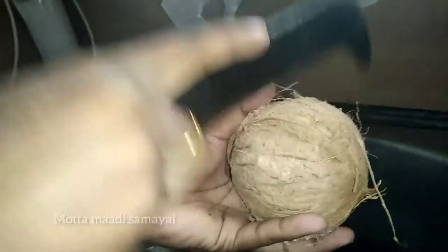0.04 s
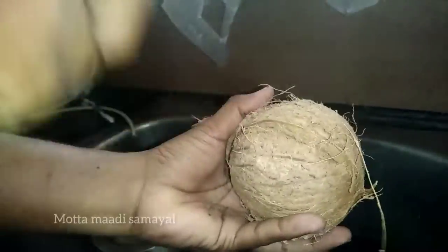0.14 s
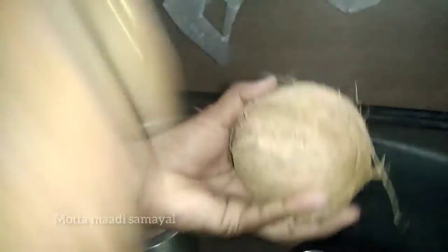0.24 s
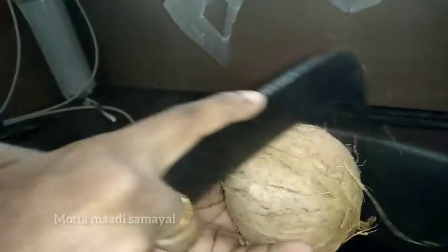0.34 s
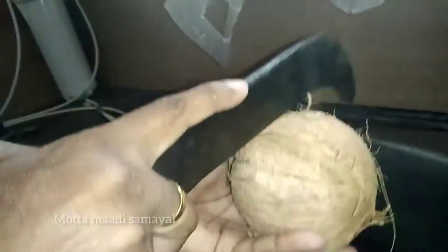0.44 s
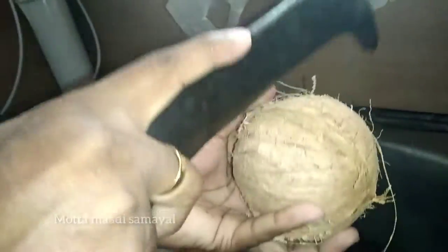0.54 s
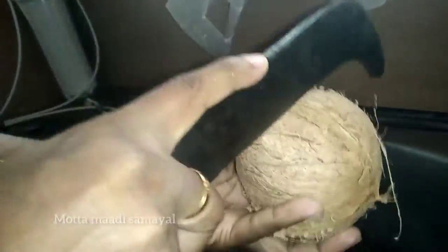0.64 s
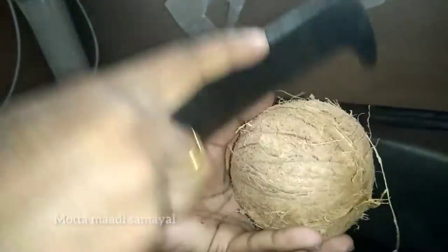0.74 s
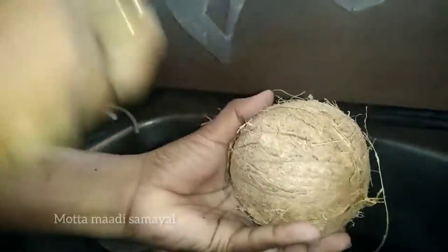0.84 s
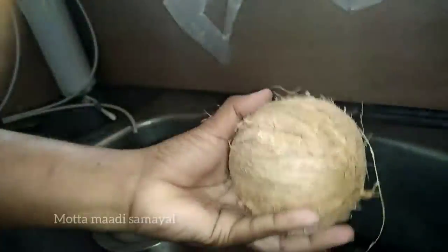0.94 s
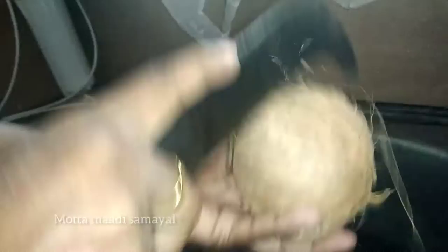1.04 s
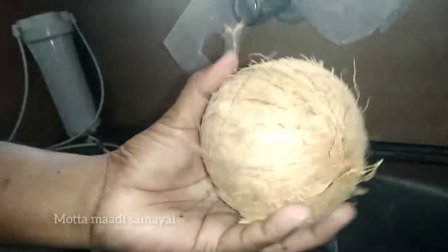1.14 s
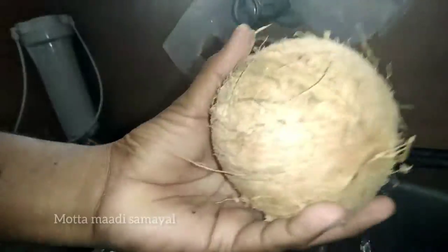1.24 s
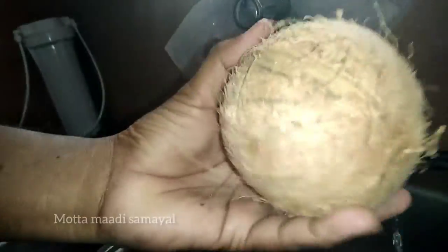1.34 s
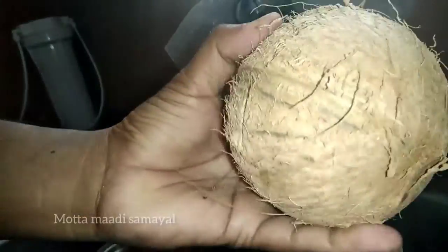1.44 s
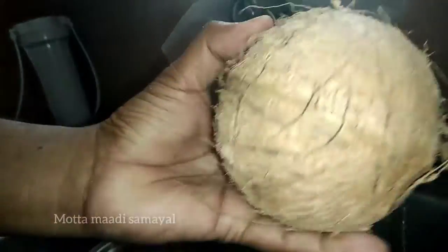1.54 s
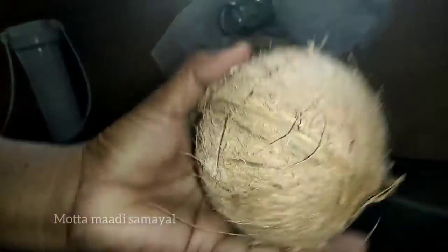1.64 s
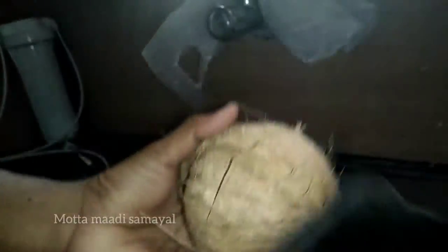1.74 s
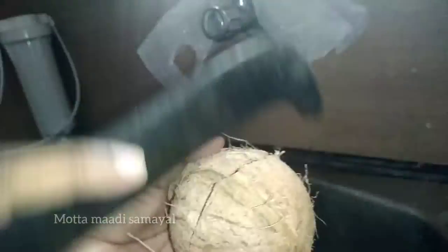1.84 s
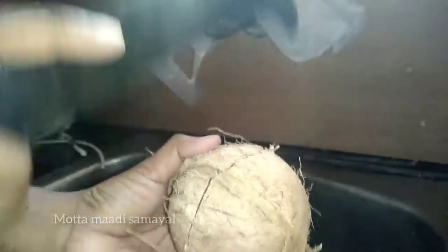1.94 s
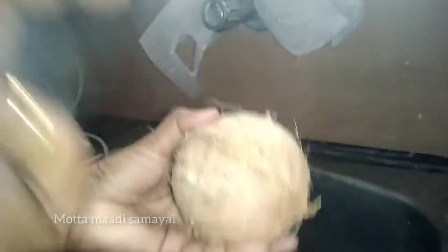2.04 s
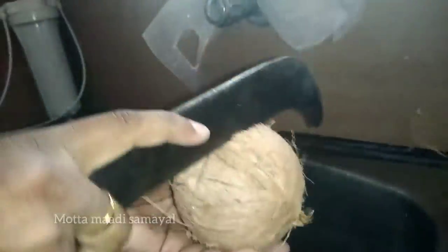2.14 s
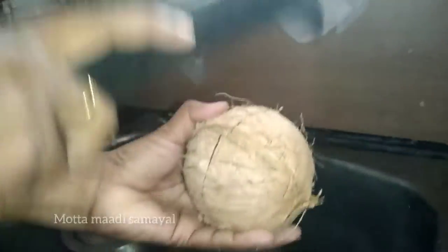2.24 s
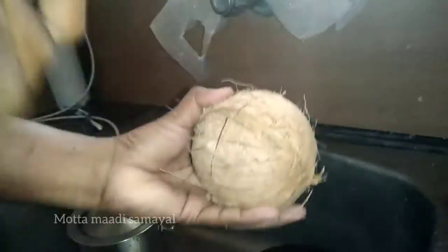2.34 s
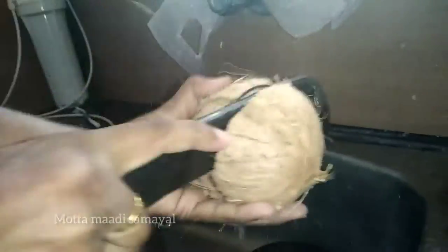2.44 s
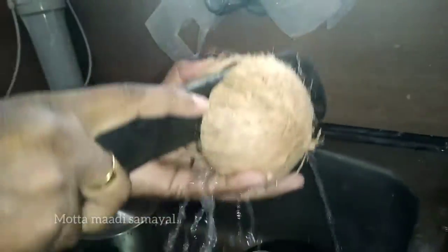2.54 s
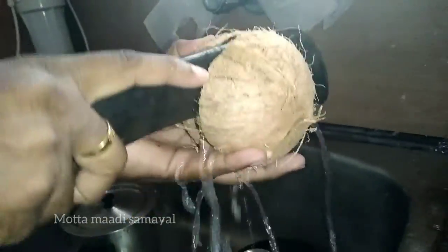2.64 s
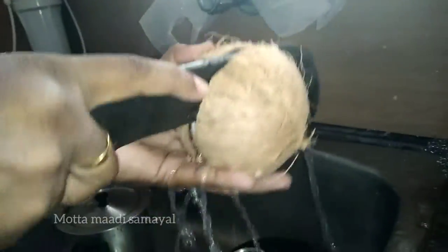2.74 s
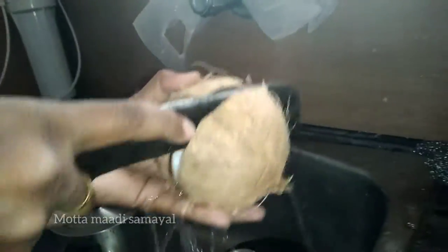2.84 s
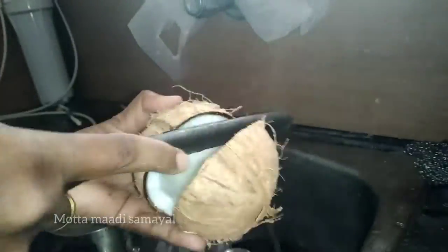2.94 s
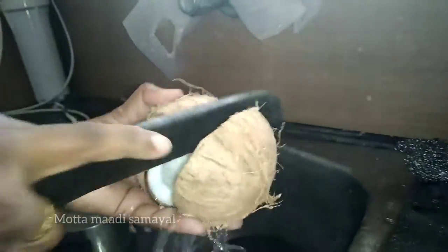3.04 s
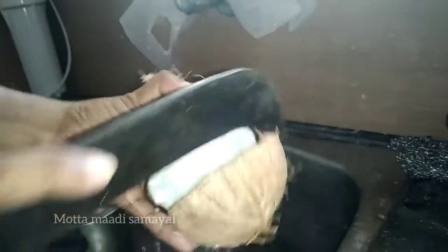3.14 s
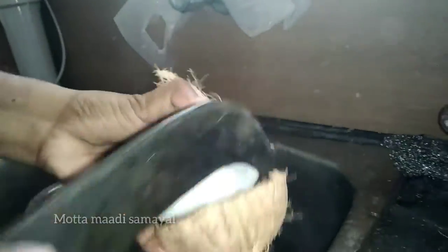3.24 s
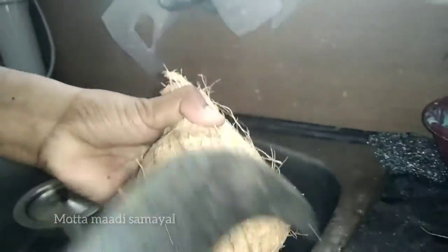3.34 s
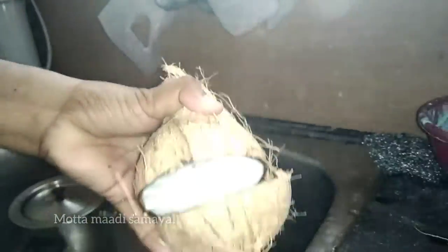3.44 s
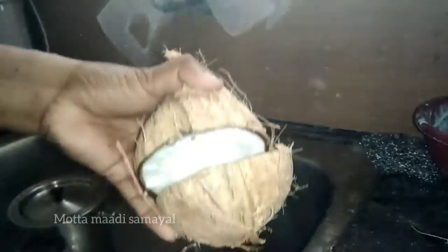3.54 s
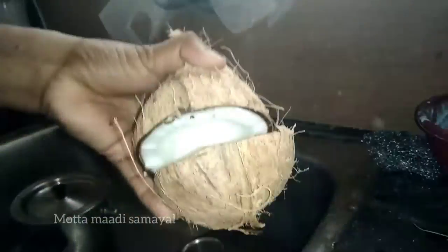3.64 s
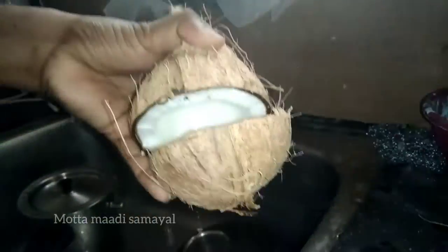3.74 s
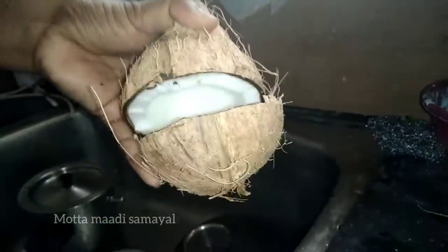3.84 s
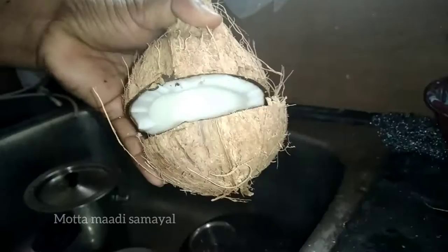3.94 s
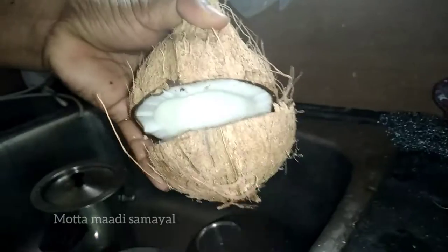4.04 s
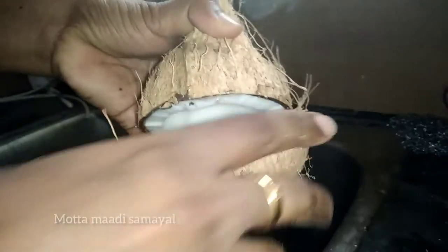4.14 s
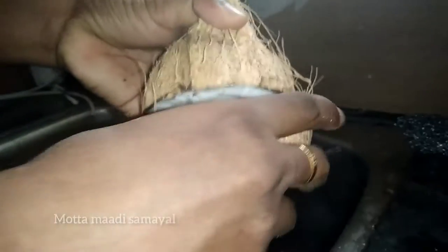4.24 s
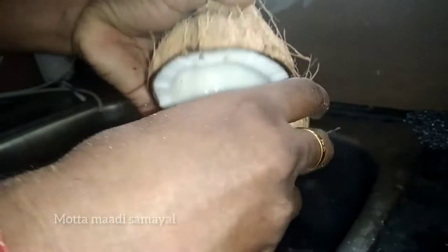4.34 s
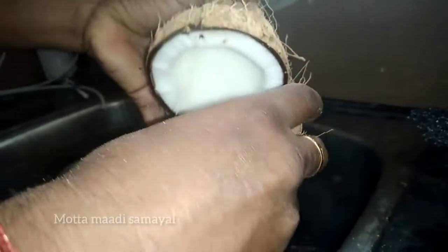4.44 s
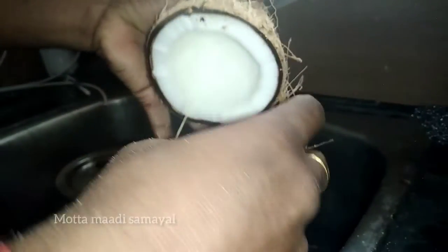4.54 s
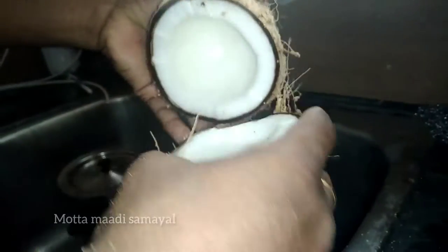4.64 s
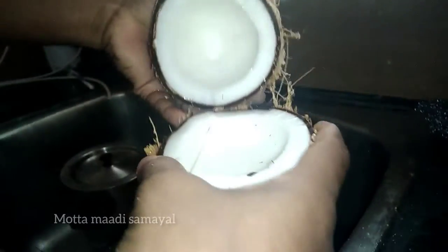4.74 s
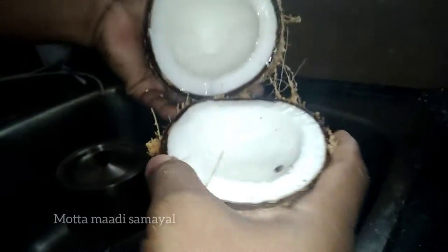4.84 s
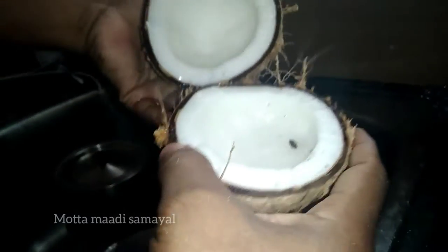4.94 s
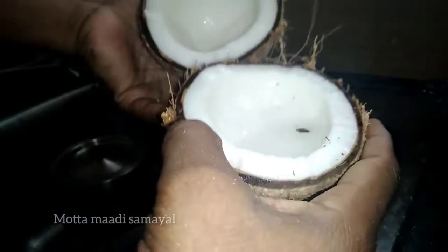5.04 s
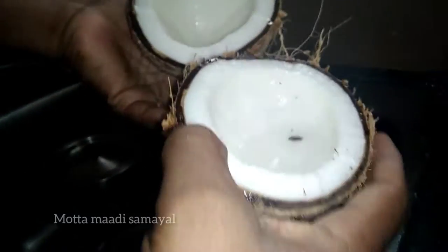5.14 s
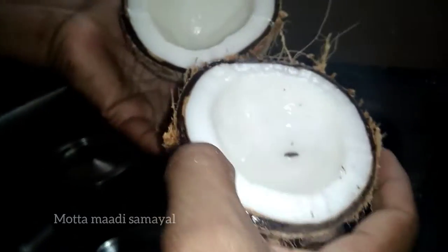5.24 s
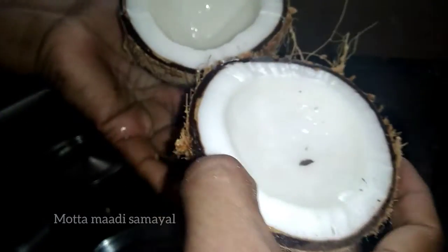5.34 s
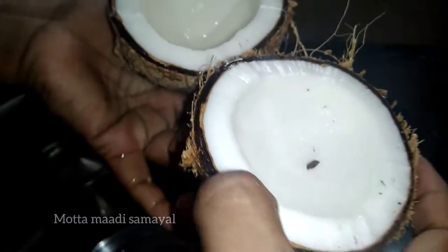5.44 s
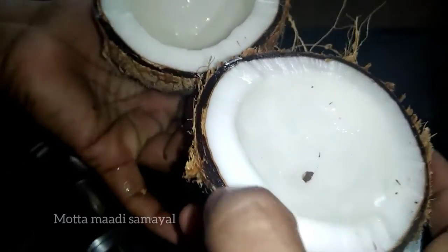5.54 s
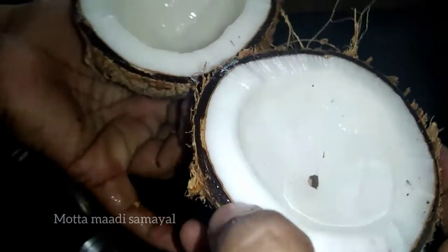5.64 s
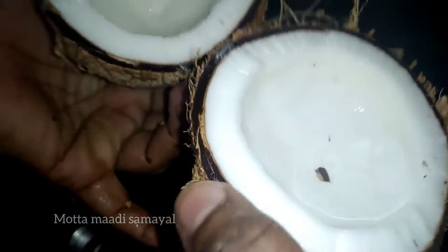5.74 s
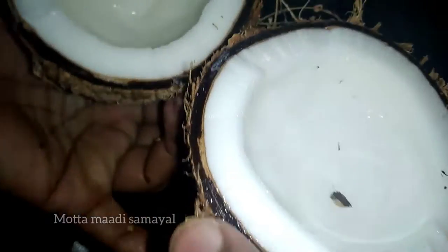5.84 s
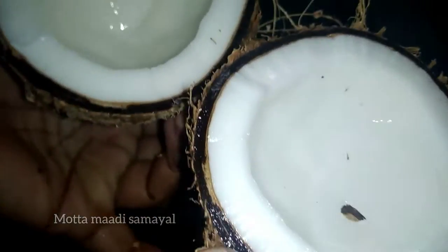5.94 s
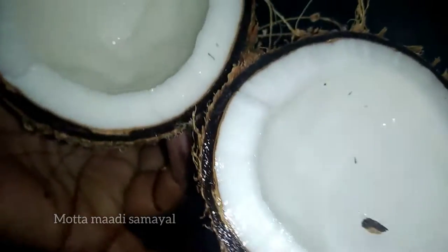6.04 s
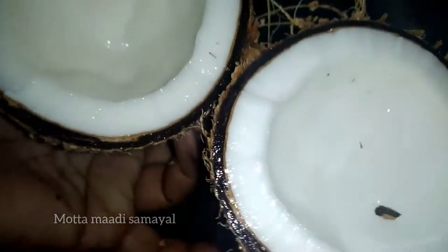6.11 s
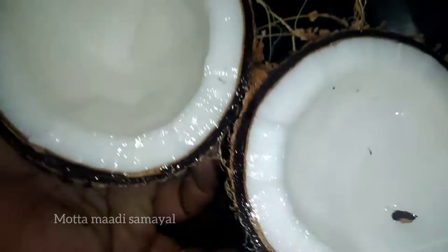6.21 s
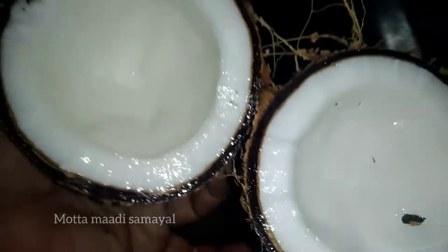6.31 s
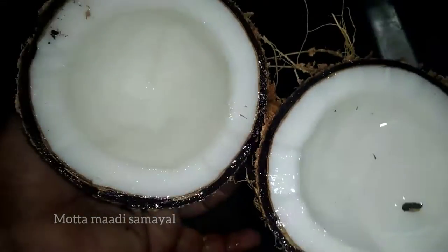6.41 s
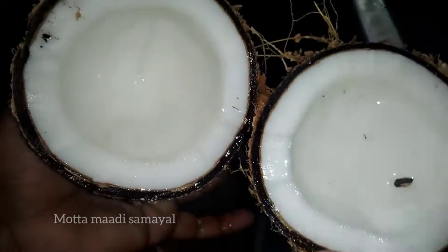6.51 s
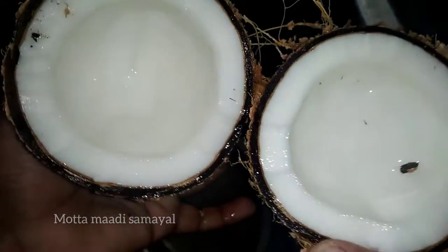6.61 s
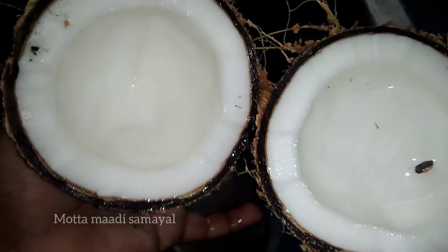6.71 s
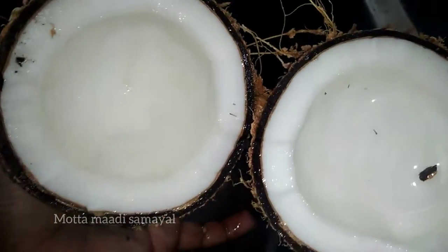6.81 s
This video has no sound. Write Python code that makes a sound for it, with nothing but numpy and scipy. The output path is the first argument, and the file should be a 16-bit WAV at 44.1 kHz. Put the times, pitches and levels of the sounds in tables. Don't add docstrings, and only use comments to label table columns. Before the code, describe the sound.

Heard from a nearby phone with squashed, slightly clipped peaks and a lively echo: heavy blade blows on a coconut, one lighter tap among them, a dry snap, then two cracking hits that open the shell. Liquid trickles, husk fibres tick and tear, metal chatters and bangs on the sink. Afterwards only tiny rustles, a low drain hum and faint distant bird tones remain.

```python
import sys
import numpy as np
from scipy import signal
from scipy.fft import rfft, irfft, next_fast_len
from scipy.io import wavfile
from scipy.ndimage import uniform_filter1d, minimum_filter1d, map_coordinates

SR = 44100
rng = np.random.default_rng(int(sys.argv[2]) if len(sys.argv) > 2 else 0)


def digitize_waveform(pressure):
    field = np.atleast_2d(pressure).T
    bounded = np.clip(field, -1, 1)
    quanta = np.round(bounded * 32767).astype(np.int16)
    wavfile.write(sys.argv[1], SR, quanta)


def rack_gain(trim_db):
    fader = np.asarray(trim_db, float)
    return 10 ** (fader / 20)


N = 302946


def nut_blows():
    # start_s, peak_db, room_db
    blows = [
        (-.12, -18, 8.5),
        (0.247, -4, 8.5),
    ]
    # start_s, peak_db, room_db
    tap = [
        (0.612, -28.5, 2),
        (0.615, -14.5, -14.5),
    ]
    # start_s, peak_db, room_db
    third = [
        (0.978, -23.5, 13.5),
        (0.983, -12, 9),
    ]
    # start_s, peak_db, room_db
    splits = [
        (2.01, -3.5, 6.5),
        (2.339, -0.2, 3.5),
    ]
    # start_s, peak_db, room_db
    snap = [
        (1.334, -6, -19.5),
    ]
    # start_s, peak_db, room_db
    runs_on = [
        (1.339, -14.5, -16),
        (1.343, -15.5, -17),
    ]
    # centre_hz, width_hz, level_db
    shell = [(440, 29, -4.5), (605, 46, 1.5), (807, 300, 2), (1335, 990, 2)]
    # centre_hz, width_hz, level_db
    cracked = [(440, 250, -13), (810, 67, 2), (890, 68, 3.5), (1242, 300, -10.5), (1580, 110, -1)]
    # centre_hz, width_hz, level_db
    opened = [(402, 100, -10.5), (834, 87, 5.5), (1124, 123, 3), (1430, 120, 0), (1563, 130, 2)]
    # centre_hz, width_hz, level_db
    seam = [(2360, 20, -1.5), (3210, 46, 2.5), (3960, 67, -5), (5130, 70, -5), (6150, 150, -11),
            (8700, 60, -9.5), (9060, 53, -15), (10800, 150, -14)]
    # centre_hz, width_hz, level_db
    wider = [(2290, 70, 2), (3300, 90, -3.5), (4320, 90, -4.5), (5200, 90, -5), (8500, 60, -7),
             (9420, 80, -12.5)]
    whole_db = [-1, -7.5, 4, -17, -20, -18, 0, -28, -12.5, -7.5, 1, -4.5, -13, -5, -12.5, -4.5, -2, -8.5,
                -6.5, 0, -34, 3, 2, 3, -5, 9, 1, 6, -7.5, 1.5, -3, -2, -18, -12.5, -5.5, -8.5, -9]
    flat_db = [2.5, 3.5, 5, -6.5, -16.5, -10, 0, -23, -15, -9.5, 2, -9, -22.5, -9, -9.5, -8.5, -8.5, -12,
               -14, -7, -18, -3.5, -4.5, -9, -13, -1.5, -6.5, 3.5, -12.5, -3.5, -7.5, -10, -15, -8, -11,
               -14.5, -16]
    edgewise_db = [-13.5, -22, 8, -14, -22.5, -16, -0.5, -26, -30, -16, 0.5, -22, -20, -6, -1, 2.5, 1.5,
                   -20, -9.5, 8, -14, -5, 1, -9, 8.5, 6.5, 1.5, -5.5, -8, -2, -12.5, -12, -17.5, -12, -13.5,
                   -15, -15]
    cracked_db = [-6, -2.5, -28, -3, -10.5, -16.5, -2.5, -6, -8, -3.5, -9, -7.5, -9, -10.5, -8, -15, -2.5,
                  -9.5, -13, 3, -24, -6.5, 0.5, -4.5, -2, -8, -9.5, -6.5, -6, -7, -17, -16, -14, -22, -17.5,
                  -16, -11.5]
    wedged_db = [-2.5, 0.5, 0.5, 0, -13, -11, -2.5, -7, -8, -4.5, -1.5, -6.5, -16.5, -7, 0, -16, -3, -10,
                 -8.5, -0.5, -7, -1, -4, -12.5, -3.5, 1.5, -6, -12.5, -8, -11.5, -16, -14, -14, -21, -25,
                 -19, -14.5]
    # from_s, to_s
    silence = (1.029, 1.3)

    nut = strikes(blows, blade(whole_db, width_hz=20), shell, force_db=23.0, crack_s=0.17,
                  thud_db=-14.5, ring_db=2.0, knock_db=-13.5, treble_db=-4.0)
    nut += strikes(third, blade(flat_db, width_hz=47), shell, force_db=21.0, crack_s=0.13,
                   thud_db=-17.5, ring_db=3.0, knock_db=-9.5, treble_db=-3.5)
    t = np.arange(N) / SR
    nut *= uniform_filter1d(1. - ((t > silence[0]) & (t < silence[1])), size=120)
    for split, grip_db, body in zip(splits, (cracked_db, wedged_db), (cracked, opened)):
        nut += strikes([split], blade(grip_db, width_hz=52), body, force_db=19.0, crack_s=0.18,
                       thud_db=-14.0, ring_db=3.5, knock_db=-3.0, treble_db=-2.5, edge_db=-6)
    nut += strikes(tap, blade(edgewise_db, width_hz=20), shell, force_db=24.5, crack_s=0.13,
                   thud_db=-13, ring_db=1.5, knock_db=-6, treble_db=2.0)
    nut += strikes(snap, seam, shell, force_db=13.0, crack_s=0.03, thud_db=-23.5, ring_db=7.5,
                   knock_db=-12.5, treble_db=35.5, edge_db=-6.5, near_db=-5.5)
    nut += strikes(runs_on, wider, shell, force_db=17.0, crack_s=0.04, thud_db=-36, ring_db=11.0,
                   knock_db=-16, treble_db=18, edge_db=-25.5, near_db=-2)
    return nut


def blade_on_sink():
    # start_s, peak_db, room_db
    clatter = [
        (3.462, -23, -1.5),
        (3.466, -9.5, 0),
        (3.477, -10, -3),
    ]
    # start_s, peak_db, room_db
    rocks = [
        (3.496, -8, -9),
        (3.514, -8, -15),
        (3.531, -17.5, -15),
        (3.547, -19, -15),
        (3.636, -24, -16.5),
    ]
    # start_s, peak_db, room_db
    knocks = [
        (3.543, -17, -11),
        (3.638, -18.5, -12.5),
        (3.728, -30.5, -20.5),
        (3.733, -26, -26),
        (3.739, -21, -28.5),
        (3.748, -26, -25),
        (3.756, -26.5, -23.5),
    ]
    # start_s, peak_db, room_db
    drop = [
        (3.867, -4, 1.5),
    ]
    # centre_hz, width_hz, level_db
    basin = [(616, 40, -9), (958, 76, 0.5)]
    laid_db = [-7, 2.5, -7, -30, -0.5, -15.5, 0.5, -3.5, -7, -10.5, -2, -25.5, -6.5, -14, -6.5, -8, -11.5,
               -2, -18, 2, -5.5, -4.5, -5.5, -6, -9, -4, -7, 1.5, -3.5, -14, -15, -15, -14.5, -0.5, -15,
               -17, -11]
    rocking_db = [-3.5, -8, 1, -20, -11, -6.5, -5, 0, -7, -7, -2.5, -25.5, -2, -7, -3, -4.5, -13, -1, -17,
                  4, -4, 1.5, -7, -7.5, -10, -6, -8, 1.5, -2.5, -14, -15, -15.5, -14.5, -3.5, -14, -18,
                  -7.5]
    loose_db = [-6, -2, 0, -20, -7, -10.5, 1, -4, -8.5, -9.5, 1, -8, -9.5, -6.5, -21.5, -9.5, -8, -2, -3,
                -10.5, -21.5, -9.5, 0.5, 3, -4.5, 3, -17.5, -6.5, -2.5, -9, -17.5, -16.5, -18.5, -12, -10.5,
                -16, -13.5]
    # centre_hz, width_hz, level_db
    linger = [(3960, 7, -9)]

    sink = strikes(clatter, blade(laid_db, width_hz=34), basin, force_db=9.0, crack_s=0.08,
                   thud_db=-46.0, ring_db=15.5, knock_db=-20.0, treble_db=4.5, near_db=-5)
    sink += strikes(rocks, blade(rocking_db, width_hz=24), basin, force_db=7.5, crack_s=0.042,
                    thud_db=-45.0, ring_db=11.5, knock_db=-23.0, treble_db=-6.5, near_db=1.5)
    sink += strikes(knocks, blade(laid_db, width_hz=55), basin, force_db=18.0, crack_s=0.11,
                    thud_db=-43.5, ring_db=-0.5, knock_db=9.5, treble_db=-1, edge_db=0)
    sink += strikes(drop, blade(loose_db, width_hz=28) + linger, basin, force_db=22.0, crack_s=0.39,
                    thud_db=-10.0, ring_db=8.0, knock_db=-35.0, treble_db=-3.0, edge_db=-1.0, near_db=-18)
    return sink


def blade(levels_db, width_hz):
    blade_hz = [1700, 2010, 2340, 2680, 2850, 3250, 3930, 4310, 4720, 4980, 5195, 5790, 6080, 6630, 6920,
                7080, 7345, 7865, 8160, 8480, 8950, 9460, 9700, 10080, 10330, 10510, 10800, 11070, 11610,
                11800, 12200, 12600, 12900, 13200, 13400, 14300, 14800]
    return [(hz, max(width_hz, 36), db) for hz, db in zip(blade_hz, levels_db)]


def strikes(events, steel, body, force_db, crack_s, thud_db, ring_db, knock_db, treble_db,
            edge_db=-6.5, near_db=-6.5):
    # freq_hz, density_db (per Hz)
    crack_spectrum = [(24, -53.5), (40, -16.5), (320, -7), (422, 1.5), (697, -5), (918, -2), (1270, -1),
                      (2440, 4), (5050, -6.5), (6170, -11), (9690, -12), (14800, -35.5), (16000, -46)]
    # centre_hz, width_hz, level_db
    shimmer = [(10000, 4800, -5), (11770, 2600, -20.5)]
    # centre_hz, width_hz
    hand = (94, 446)
    shimmer_s, edge_s = 0.12, 0.006
    ports = np.array([[1], [-.3]])
    lead = SR // 4
    out = np.zeros((2, lead + N + SR))
    t = np.arange(SR // 2) / SR
    impulse = 1. * (t == 0)

    def norm(x):
        return x / np.linalg.norm(x, axis=-1, keepdims=True)

    def struck(modes):
        def response(f):
            return sum((-1) ** k * rack_gain(db) * resonance(hz, max(width_hz, 5))(f)
                       for k, (hz, width_hz, db) in enumerate(modes))
        return norm(filtered(impulse, response))

    def colour(f):
        tilt_db = along([(500, -treble_db), (3000, 0)], f)
        return rack_gain(along(crack_spectrum, f) + tilt_db)

    def humps(f):
        return sum(rack_gain(db) * resonance(hz, width_hz)(f) ** 2 for hz, width_hz, db in shimmer)

    ring, knock = struck(steel), struck(body)
    thud = rack_gain(thud_db) * struck([(*hand, 0)])
    for s, db, room_db in events:
        burst = rng.standard_normal((2, len(t))) * rack_gain(-60 * t / crack_s)
        crack = norm(filtered(np.roll(burst, 16, axis=1), colour))
        jangle = rng.standard_normal(len(t)) * rack_gain(-60 * t / shimmer_s)
        dense_modes = rack_gain(shimmer[0][2]) * norm(filtered(jangle, humps))
        tones = rack_gain(ring_db) * (ring + dense_modes) + rack_gain(knock_db) * knock + thud
        into_room = norm(filtered(np.roll(impulse, 64), colour)) + tones
        click = np.diff(rng.standard_normal((2, len(t) + 1))) * rack_gain(-60 * t / edge_s)
        direct = crack + rack_gain(edge_db) * norm(click) + rack_gain(near_db) * tones * ports
        start = lead + round(s * SR)
        out[:, start:start + len(t)] += rack_gain(db + force_db) * (direct + rack_gain(room_db) * echo(into_room))
    return out[:, lead:lead + N]


def echo(x):
    # freq_hz, t60_s
    room = [(80, 0.29), (300, 0.51), (1500, 0.54), (5000, 0.5), (14000, 0.37)]
    hz, t, z = signal.stft(rng.standard_normal((2, len(x))), SR, nperseg=256)
    decay = rack_gain(-60 * t / along(room, hz)[:, None])
    tail = paired(signal.istft(z * decay, SR, nperseg=256)[1])
    return signal.fftconvolve(x[None], tail / np.linalg.norm(tail[0]), axes=1)[:, :len(x)]


def ticks():
    # start_s, peak_db, centre_hz, pan_db
    touches = [(0.22, -24, 1870, -2), (0.95, -22.5, 1830, 1), (1.13, -24.5, 3470, -1),
               (0.9395, -26, 2930, -2), (2.5, -22.5, 2600, 0), (0.22, -27, 3000, -0.5),
               (1.136, -29, 3800, 1), (1.959, -29, 1900, 1), (2.3072, -18, 2200, 1.5),
               (2.831, -26, 2450, -8), (2.9085, -20.5, 2750, 5.5), (3.102, -20.5, 2570, -2),
               (4.586, -36, 3200, 2.5), (2.815, -27.5, 2500, 2), (4.992, -43.5, 3670, -3),
               (5.531, -49, 4700, -9), (5.175, -41, 5100, 1)]
    # start_s, peak_db, centre_hz, pan_db
    snaps = [(0.822, -36, 11500, 6), (1.181, -40, 10000, 2), (1.198, -35, 10000, 2),
             (1.2243, -29, 10300, 2), (1.258, -33, 9600, 8), (1.943, -39, 11300, 3),
             (1.561, -19.5, 12900, -1), (1.676, -31, 12800, -8), (2.702, -17, 10260, 3),
             (2.709, -22, 10000, 4), (2.739, -21, 5914, 1), (2.8014, -33, 11000, 2),
             (2.8145, -17.5, 10800, -6), (2.938, -18, 10000, 3), (2.972, -26, 10400, 3),
             (3.02, -34, 10000, 0), (3.0572, -13, 10000, 6), (3.073, -20, 10000, 6),
             (3.1228, -25, 10800, 5), (3.1923, -23, 4070, -7), (3.356, -26, 11600, 4),
             (3.38, -23, 10000, 6), (3.419, -29, 10200, 13), (4.587, -28.5, 10400, 6),
             (4.635, -34, 11900, 4), (4.647, -30, 11500, 4), (4.771, -34, 11100, -2),
             (4.782, -28.5, 11420, 4), (4.804, -34, 12000, 0), (4.863, -36, 12300, 2),
             (4.877, -31.5, 12000, 5), (5.044, -41, 10600, 3), (5.166, -35, 10100, 3),
             (5.181, -33, 10000, 3), (5.226, -42, 9900, 6), (4.702, -28.5, 11570, 6),
             (4.7491, -33, 13400, 0), (5.056, -38, 10500, 6), (4.814, -34, 12000, 3),
             (5.103, -39, 13000, 3), (5.309, -41, 10500, 5), (5.852, -47, 10000, 5), (6.324, -44, 11000, 5),
             (6.42, -43, 12500, 7), (5.3985, -35.5, 10500, 9), (5.464, -39.5, 10300, 6),
             (5.53, -34, 8950, -4), (6.242, -42.5, 11200, 8.5), (6.446, -43, 10800, 15)]
    touch_t60_s, snap_t60_s = 0.035, 0.022
    broad_db, broad_hz = -15, 4200
    out = np.zeros((2, N + SR))
    t = np.arange(SR // 4) / SR
    events = [(*row, touch_t60_s) for row in touches] + [(*row, snap_t60_s) for row in snaps]
    for s, db, hz, pan_db, t60_s in events:
        def response(f):
            wide = (hz > broad_hz) * rack_gain(broad_db) * resonance(broad_hz, 2 * broad_hz)(f)
            return resonance(hz, 0.35 * hz)(f) ** 2 + wide

        onset = 1 - np.exp(-t * hz / 4)
        burst = rng.standard_normal((2, len(t))) * rack_gain(-60 * t / t60_s) * onset
        tick = filtered(burst, response)
        tick = tick / np.abs(tick).max(axis=1, keepdims=True) * rack_gain([[pan_db / 2], [-pan_db / 2]])
        out[:, round(s * SR):][:, :len(t)] += rack_gain(db + 2.5) * (tick + rack_gain(-7.0) * echo(tick[0]))
    return out[:, :N]


def handling():
    # start_s, hold_s, level_db, dull_db (dull rub over fibres)
    strokes = [(0.934, 0.05, -44, 14.5), (1.082, 0.024, -36.5, 1), (1.264, 0.14, -50, 12),
               (1.486, 0.0097, -37.5, -7), (1.606, 0.066, -52.5, 7), (3.7, 0.018, -44.5, 13.5),
               (3.79, 0.081, -50.5, 8.5), (4.105, 0.12, -44, 4), (4.768, 0.031, -57, 3),
               (4.876, 0.079, -50.5, 2), (5.173, 0.024, -49.5, -3), (4.41, 0.12, -53, 2.5),
               (5.487, 0.15, -63.5, 2), (5.739, 0.12, -65, -6.5), (6.412, 0.096, -64.5, 15),
               (6.596, 0.16, -79.5, 25)]
    # start_s, level_db, dull_db (dull
    flicks = [(.218, -47, 8), (.854, -62, -26), (1.141, -42, 0), (1.52, -58, -23), (1.854, -48.5, 0),
              (1.96, -47.5, 10), (2.742, -43.5, 10), (3.106, -33, -6), (3.128, -46, -13), (3.199, -31, -18),
              (3.358, -31.5, -2.5), (3.382, -45, -2), (3.429, -45, -1), (3.636, -34, 0),
              (4.282, -42.5, -18), (4.297, -61, -12), (4.587, -50.5, 11), (4.641, -43, -6),
              (4.7, -51.5, 7.5), (4.752, -61, -8), (4.789, -56, -12), (5.2, -63, -4), (5.24, -58, 4),
              (4.88, -59, -10), (5.305, -53, -3), (5.401, -86, -21), (5.53, -51, -8), (6.24, -59.5, 12.5),
              (6.32, -59, 5), (6.84, -75, -7)]
    # time_s, flow_db
    water = [(2.53, -69), (2.6, -28.5), (2.685, -36.5), (2.74, -31), (2.77, -32.5), (2.79, -32.5),
             (2.84, -28), (2.89, -32.5), (2.908, -25.5), (3.03, -26.5), (3.05, -31), (3.235, -34),
             (3.27, -33.5), (3.45, -56.5)]
    # freq_hz, density_db (per Hz)
    fibre_spectrum = [(2060, -28), (3500, -2.5), (4340, -3.5), (5670, -6), (6740, -6.5), (9930, 4.5),
                      (11800, -2), (14900, -6.5), (16000, -12.5)]
    # freq_hz, density_db (per Hz)
    rub_spectrum = [(59, -41), (130, -1), (200, -3.5), (449, -4.5), (584, -4), (1300, -3.5), (1470, -5),
                    (2440, -6.5), (6500, -20.5), (8450, -24), (14300, -120)]

    moves = [(swell(s, hold_s, db, rise_db_s=182, fall_db_s=118.5), dull_db)
             for s, hold_s, db, dull_db in strokes]
    moves += [(swell(s, 0.0038, db, rise_db_s=704, fall_db_s=344.5), dull_db)
              for s, db, dull_db in flicks]
    flow_db = curve(water, order=1, silent=-200)
    middle_db = np.mean(water, axis=0)[1]
    spray_db = -42 + 1.4 * (flow_db - middle_db)
    spray = uniform_filter1d(rack_gain(spray_db), size=300)
    splash = uniform_filter1d(rack_gain(flow_db), size=300)
    high = fine(sum(gain for gain, _ in moves)) + spray
    low = fine(sum(gain * rack_gain(dull_db) for gain, dull_db in moves)) + splash
    fibres = rack_gain(1.0) * high * rush(fibre_spectrum, patchy_db=3.5, grains=0.0072, spike_db=-6.0)
    rub = rack_gain(-6.0) * low * rush(rub_spectrum, patchy_db=4, grains=0.003, spike_db=0)
    return fibres * rack_gain([[2.2], [-2.2]]) + rub * rack_gain([[1.1], [-1.1]])


def drain():
    # start_s, hold_s, level_db
    hums = [
        (4.358, 0.024, -54),
        (4.698, 0.11, -51),
        (5.092, 0.095, -59),
        (5.722, 0.026, -54),
        (5.969, 0.14, -54),
        (6.508, 0.016, -52.5),
        (6.706, 0.016, -71.5),
    ]
    gain = sum(swell(*row, rise_db_s=72.5, fall_db_s=147) for row in hums)
    return tone(478, gain, blur_hz=22.7)


def far_voices():
    # start_s, hold_s, pitch_hz, level_db, wander_hz
    far = [
        (5.739, 0.18, 2090, -56.5, 3.9),
        (6.126, 0.15, 1496, -59.5, 16),
        (6.44, 0.3, 350.6, -56, 45.1),
    ]
    lines = 0
    for s, hold_s, hz, db, blur_hz in far:
        lines = lines + tone(hz, swell(s, hold_s, db, rise_db_s=180.5, fall_db_s=180.5), blur_hz)
    return lines


def squeal():
    # time_s, pitch_hz
    glide = [(6.54, 11642), (6.57, 12800), (6.6, 13387), (6.728, 12370), (6.77, 13300), (6.8, 13200),
             (6.826, 12060), (6.86, 11050)]
    first_s, last_s = glide[0][0], glide[-1][0]
    flutter = 1 + np.sin(2 * np.pi * 45 * np.arange(N) / SR)
    gain = swell(first_s, last_s - first_s, -65.5, rise_db_s=2000, fall_db_s=1980)
    return flutter * tone(curve(glide, order=1), gain, blur_hz=40.3)


def room_air():
    # freq_hz, density_db (per Hz)
    air_spectrum = [(12, -53.5), (20, -32.5), (74, -1), (163, -5), (270, -1.5), (357, -6.5), (485, 0.5),
                    (607, -8), (720, -10), (900, -8), (2080, -10.5), (2260, -13), (3950, -18.5),
                    (6720, -27.5), (11100, -15.5), (13500, -25.5), (16000, -26.5)]
    air = rush(air_spectrum, patchy_db=1.2, grains=0, spike_db=0)
    return rack_gain(-53.5) * air * rack_gain([[1.4], [-1.4]])


def resonance(hz, width_hz):
    return lambda f: 1j * f * width_hz / (hz * hz - f * f + 1j * f * width_hz)


def rush(spectrum, patchy_db, grains, spike_db):
    z = signal.stft(rng.standard_normal((2, N)), nperseg=512)[2]
    field = uniform_filter1d(uniform_filter1d(rng.standard_normal(z.shape[1:]), 6, 0), 8, 1)
    x = signal.istft(z * rack_gain(patchy_db * field / field.std()), nperseg=512)[1][:, :N]
    burst = (rng.random(N) < grains) * rack_gain(spike_db * rng.exponential(size=N))
    x = x * (1 + uniform_filter1d(burst, size=24) * 24)
    return unit(filtered(paired(x), lambda hz: rack_gain(along(spectrum, hz))))


def tone(hz, gain, blur_hz):
    wander = map_coordinates(rng.standard_normal(N // 600 + 4), [np.arange(N) / 600])
    phase = 2 * np.pi * np.cumsum(hz + blur_hz * wander) / SR
    return rack_gain(-4.5) * fine(gain) * np.sin(phase)


def paired(two):
    # freq_hz, correlation (-1 to 1)
    alike = [(40, -.4), (150, -.72), (400, -.35), (1200, -.05), (3000, -.1), (10000, -.05)]

    def mid_side(hz):
        turn = np.arccos(np.clip(along(alike, hz), -1, 1)) / 2
        return np.array([np.cos(turn), np.sin(turn)])

    mid, side = filtered(two, mid_side)
    return np.array([mid + side, mid - side])


def filtered(x, response):
    m = next_fast_len(x.shape[-1] + 4096)
    return irfft(rfft(x, m) * response(np.fft.rfftfreq(m, 1 / SR)), m)[..., :x.shape[-1]]


def unit(x):
    return x / np.sqrt(np.mean(x ** 2, axis=-1, keepdims=True) + 1e-20)


def along(points, hz):
    f, v = np.transpose(points)
    return np.interp(np.log(hz + 1), np.log(f + 1), v)


def curve(rows, order, silent=None):
    rows = np.array(rows)
    return np.interp(np.arange(N) / SR, rows[:, 0], rows[:, order], silent, silent)


def swell(start, hold, db, rise_db_s, fall_db_s):
    t = np.arange(0, N + 64, 64) / SR
    before, after = np.maximum(start - t, 0), np.maximum(t - start - hold, 0)
    return rack_gain(db - rise_db_s * before - fall_db_s * after)


def fine(coarse):
    return np.interp(np.arange(N), np.arange(len(coarse)) * 64, coarse)


def scene():
    struck = (nut_blows() + blade_on_sink()) * rack_gain([[1.5], [-1.5]])
    lines = drain() + far_voices() + squeal()
    return struck + ticks() + handling() + lines * [[1.7], [.3]] + room_air()


def gain_control(dry):
    level = np.sqrt(np.abs(uniform_filter1d(dry ** 2, size=64, axis=1)))
    held = -minimum_filter1d(-level, size=700, axis=1, origin=340)
    threshold_db = np.array([[-7.5], [-9.5]])
    cut_db = -.85 * np.maximum(20 * np.log10(held + 1e-9) - threshold_db, 0)
    x = dry * rack_gain(uniform_filter1d(cut_db, size=220, axis=1, origin=100))
    return x / (1 + np.abs(x / 1.05) ** 6) ** (1 / 6)


def masked(x, near_db, top_db, bass_db):
    hz, _, z = signal.stft(x, SR, nperseg=1024)
    hz = hz[:510, None]
    power = uniform_filter1d((np.abs(z[:, :510]) ** 2).sum(0), size=2, axis=1) + 1e-16
    band = np.repeat(power.reshape(102, 5, -1).mean(1), 5, axis=0)
    whim = uniform_filter1d(rng.standard_normal((102, band.shape[1])), size=6, axis=1)
    whim_db = np.repeat(whim, 5, axis=0) * 13 + top_db * np.clip(hz / 2000 - 6.7, 0, 1)
    around_gain = rack_gain(near_db + whim_db - 7 * (hz < 3000)) * (hz > 550)
    around = uniform_filter1d(band, size=90, axis=0) * around_gain
    bass = (hz < 330) * band[8:300].mean(0) * rack_gain(bass_db + 12 * whim[0] - hz / 40)

    loud = (np.abs(z) ** 2).sum((0, 1)) + 1e-16
    sudden = uniform_filter1d(1. * (loud > 6 * np.roll(loud, 2)), size=3) > .1
    top_hz = 15800 + 600 * sudden - 650 * (loud > 2e-3 * loud.max()) * ~sudden
    z[:, :510] *= (hz < top_hz) / (1 + ((around * ~sudden + bass) / band) ** 10)
    return signal.istft(z, SR, nperseg=1024)[1][:, :N]


def band_limit(x):
    return signal.sosfilt(signal.butter(12, 16460, fs=SR, output="sos"), x)


def record(dry):
    mix = masked(gain_control(dry), near_db=-11.5, top_db=10, bass_db=-10)
    return band_limit(mix)


dry = scene()
out = record(dry)
digitize_waveform(out)
```